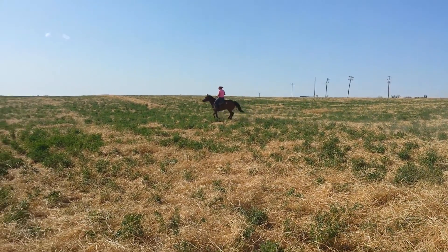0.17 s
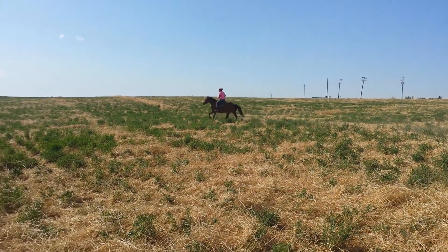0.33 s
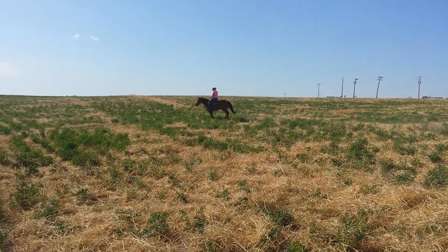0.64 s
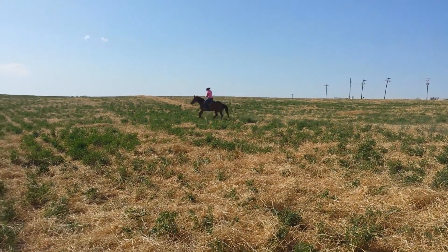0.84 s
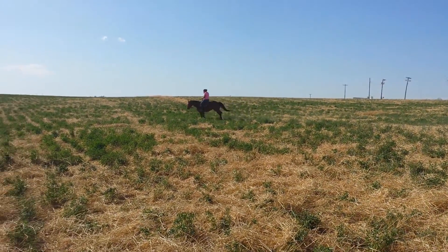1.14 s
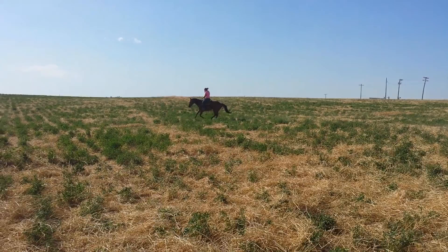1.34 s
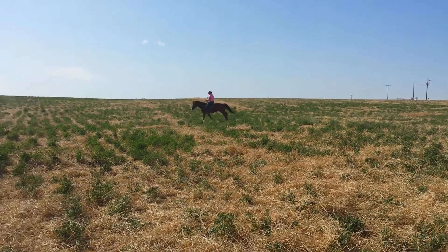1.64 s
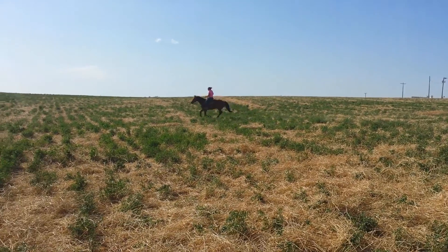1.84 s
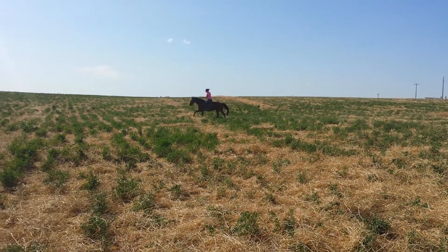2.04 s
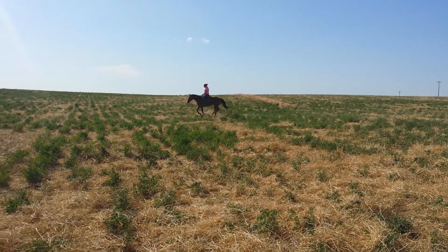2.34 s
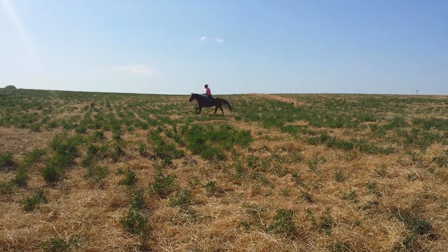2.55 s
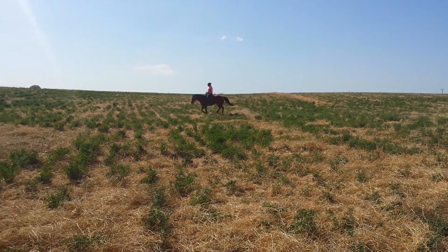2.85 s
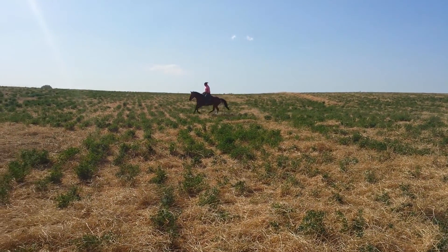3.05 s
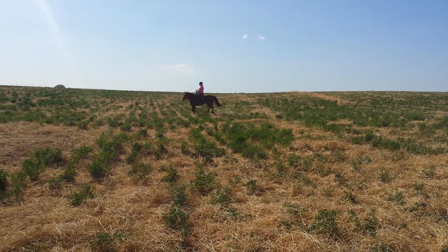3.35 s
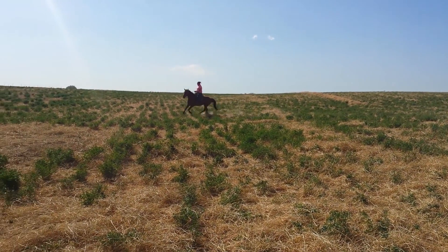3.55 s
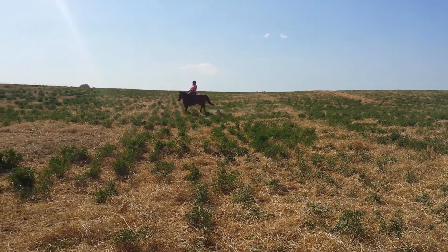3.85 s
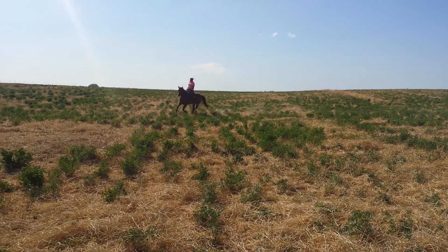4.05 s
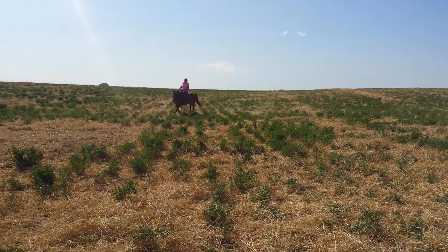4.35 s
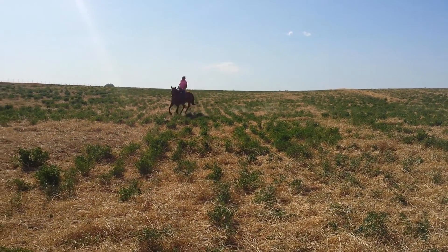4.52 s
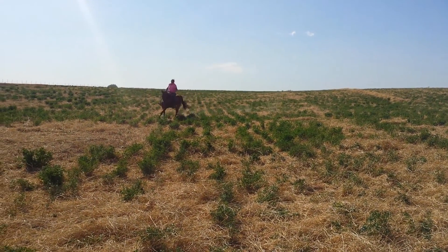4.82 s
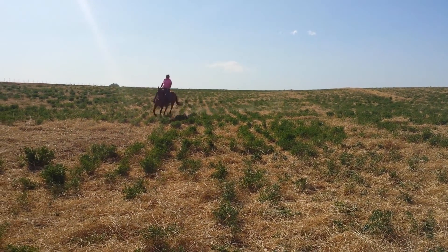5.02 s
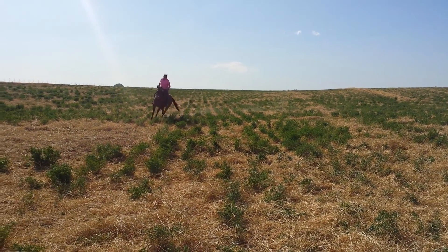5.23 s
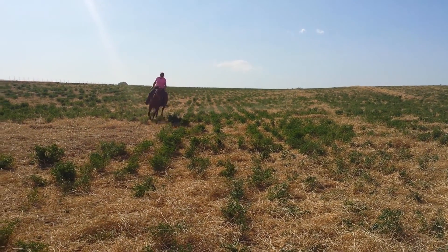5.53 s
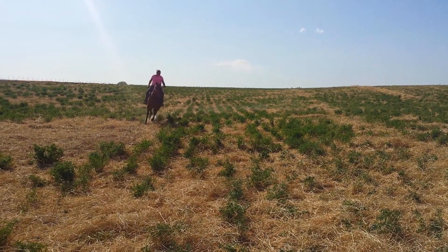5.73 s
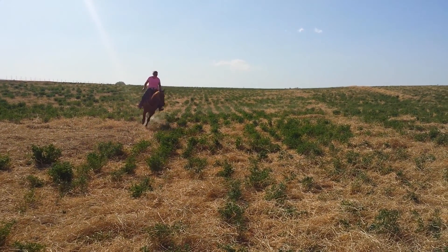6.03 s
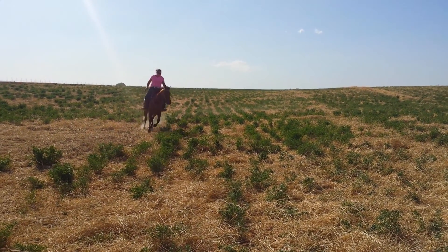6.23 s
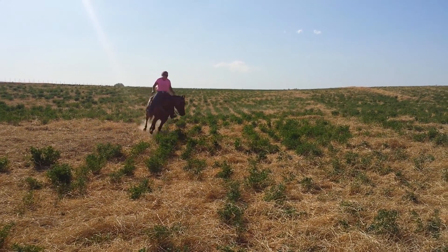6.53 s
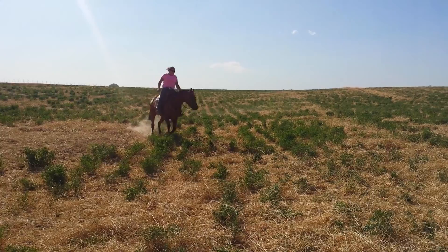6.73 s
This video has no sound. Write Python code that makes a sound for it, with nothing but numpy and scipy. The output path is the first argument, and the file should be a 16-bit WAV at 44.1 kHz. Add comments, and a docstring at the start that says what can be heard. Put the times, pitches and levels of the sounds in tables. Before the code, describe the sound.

A horse canters across an open field, blowing out a short, fluttering snort about twice a second. The snorts start faint and grow clear after two seconds. Its legs swish through dry grass and snap an occasional stalk, louder and brighter as it nears. Low wind rumbles and buffets the hand-held microphone throughout, mostly on the left, while an engine drones faintly far away.

```python
"""Horse cantering through dry grass

A horse arcs across a field towards a hand-held camera. Once a stride it blows out, and its nostrils
chop the airflow about 30 times a second. Its legs brush dry grass into a swish and snap a stalk now
and then; a few thin squeaks sound. Turbulent wind rumbles and buffets at the two microphone ports,
mostly the left one, while an engine drones far away."""
import sys
import numpy as np
from scipy import signal
from scipy.fft import rfft, irfft
from scipy.io import wavfile
from scipy.ndimage import uniform_filter1d, map_coordinates

SR = 44100
rng = np.random.default_rng(int(sys.argv[2]) if len(sys.argv) > 2 else 0)


def store_wav(level_fs):
    """Save 16-bit WAV to argv[1]."""
    pcm = np.round(np.clip(np.atleast_2d(level_fs), -1, 1) * 32767)
    wavfile.write(sys.argv[1], SR, pcm.T.astype(np.int16))


N = 303496
TIME = np.arange(N) / SR
FREQ = np.maximum(np.arange(N // 2 + 1) * SR / N, 1)
# strength of the wind at the ports (time [s], left relative level [dB], right relative level [dB])
GUSTS = [(0, -42, -37), (0.18, -36, -32), (0.33, -40, -36), (0.48, -27.5, -34), (0.7, -35.5, -37),
         (0.82, -32.5, -34), (0.93, -37.5, -33.5), (1.1, -33.5, -35), (1.28, -39.5, -32.5),
         (1.52, -31, -32.5), (1.63, -31.5, -31.5), (1.85, -31, -35), (1.97, -35.5, -38), (2.12, -33.5, -32),
         (2.4, -34, -30.5), (2.58, -29.5, -33.5), (2.75, -37, -33.5), (3.06, -36.5, -31.5),
         (3.3, -30.5, -33), (3.45, -45.5, -36), (3.58, -30.5, -37.5), (3.68, -42, -41),
         (3.82, -31.5, -34.5), (4.05, -34, -30), (4.32, -35, -32.5), (4.47, -31, -33.5),
         (4.8, -32.5, -32.5), (5.05, -36, -32.5), (5.3, -40, -31.5), (5.42, -41.5, -33.5),
         (5.72, -36.5, -37), (5.87, -35, -37), (6.08, -30.5, -37), (6.2, -53, -37.5), (6.5, -42, -36.5),
         (6.88, -47, -39)]


def undb(db):
    """Decibels to amplitude ratio."""
    return 10 ** (np.asarray(db) / 20)


def level(x, db):
    """Scale to an rms level."""
    return x * undb(db) / np.sqrt(np.mean(x ** 2))


def curve(rows, column=1):
    """Linear interpolation of one table column over time."""
    rows = np.asarray(rows, float)
    return np.interp(TIME, rows[:, 0], rows[:, column])


def colour(x, points):
    """Minimum-phase filter with a (frequency [Hz], gain [dB]) response, by folding the cepstrum."""
    size = len(x)
    hz, db = np.transpose(points)
    freq = np.maximum(np.arange(size // 2 + 1) * SR / size, 1)
    gain = undb(np.interp(np.log(freq), np.log(hz), db))
    cepstrum = irfft(np.log(gain), size)
    cepstrum[1:size // 2] *= 2
    cepstrum[size // 2 + 1:] = 0
    return irfft(rfft(x) * np.exp(rfft(cepstrum)), size)


def treble(x, hz):
    """Zero-phase high-pass filter with a soft edge."""
    return irfft(rfft(x) / (1 + (hz / FREQ) ** 4), N)


def wander(per_s):
    """Smooth random modulation with a standard deviation near 1."""
    hold = max(int(SR / per_s), 1)
    steps = rng.standard_normal(N)[np.arange(N) // hold]
    return uniform_filter1d(steps, hold) * np.sqrt(3 / 2)


def grains(patchy_db, per_s):
    """Random amplitude modulation makes white noise grainy."""
    return rng.standard_normal(N) * undb(patchy_db * wander(per_s))


def bell(t, half_s):
    """Gaussian envelope centred on t = 0."""
    return np.exp(-.5 * (t / half_s) ** 2)


def add(out, start_s, sound):
    """Superpose a short sound at a given time."""
    i = int(np.clip(start_s * SR, 0, N - 1))
    out[i:i + len(sound)] += sound[:N - i]


def wind(left_db=2.5, lumpy_db=2, lumps_per_s=18):
    """Turbulent pressure is uncorrelated between the ports; shelter thins the right one's low mids."""
    # spectrum of the turbulence (frequency [Hz], relative density [dB])
    spectrum = [(20, -37.5), (35, -11.5), (60, 0), (90, 0), (125, -1.5), (160, -5), (230, -10.5),
                (300, -21.5), (450, -33), (700, -40), (1200, -49.5)]
    # shelter of the right port (frequency [Hz], gain [dB])
    shelter = [(40, -3), (90, -4), (160, -8), (300, -10.5), (600, 0.5)]
    left = colour(grains(patchy_db=4.5, per_s=90), spectrum)
    left = level(left * undb(lumpy_db * wander(lumps_per_s)), left_db)
    right = colour(colour(grains(patchy_db=3, per_s=76), spectrum), shelter)
    right = level(right * undb(lumpy_db * wander(lumps_per_s)), 0)
    return np.array([left * undb(curve(GUSTS)), right * undb(curve(GUSTS, column=2))])


def field(side_db=-4):
    """Open-air background with a steady rustle that swells as the horse nears; its treble is diffuse."""
    # spectrum of background and rustle (frequency [Hz], relative density [dB])
    spectrum = [(150, 25.5), (400, 8), (620, -1), (860, 9), (1300, 0), (1700, 4.5), (2400, -7),
                (3500, -10.5), (6000, -29.5), (9000, -23), (15000, -7)]
    # the rustle swells as the horse approaches (time [s], relative level [dB])
    approach = [(0, -49), (2, -46), (3.2, -46), (5, -46), (6, -43), (6.88, -39.5)]
    mid, side = (level(colour(rng.standard_normal(N), spectrum), 0) for _ in range(2))
    side = undb(side_db) * treble(side, hz=1230)
    swell_db = .8 * wander(5)
    return np.array([mid + side, mid - side]) * undb(curve(approach) + swell_db)


def engine():
    """Periodic firing gives harmonics; moving air modulates the amplitude and phase of each on its own."""
    # shaft speed (time [s], rate [turns/s])
    speed = [(0, 19.1), (1, 19.3), (2, 20.2), (2.7, 21.8), (3.2, 21.95), (4.2, 22.4), (5.3, 22.35),
             (6.3, 21.85), (6.88, 21.3)]
    # firing harmonics (order [multiple of shaft rate], relative level [dB])
    orders = [(6, 5), (9, -5.5), (14, -19.5), (16, -17), (18, -17), (20, -18.5), (22, -12), (24, -15),
              (26, -25), (30, -26), (32, -18.5)]
    # strength of the overtones above the hum (time [s], gain [dB])
    overtones = [(0, -2), (2.8, -4), (3.7, 1.5), (4.8, 0.5), (5.8, -8.5), (6.88, -6.5)]
    # strength of the whole drone (time [s], level [dB])
    strength = [(0, -54), (2.6, -50.5), (3.2, -44), (4.2, -44), (5.1, -44), (5.7, -41.5), (6.88, -45.5)]
    shaft_phase = 2 * np.pi * np.cumsum(curve(speed)) / SR
    drone = np.zeros(N)
    for order, db in orders:
        gain_db = db + 2.2 * wander(8) + curve(overtones) * (order > 10)
        blur_rad = .35 * wander(10)
        drone += undb(gain_db) * np.sin(order * shaft_phase + blur_rad)
    return level(drone, 0) * undb(curve(strength))


def leg_sweeps(fall_stretch=1.3, lull_half_s=0.024):
    """Envelope of the swish: incoherent sources add in power, here leg sweeps and a running rustle."""
    # rustle as the horse nears (time [s], relative level [dB])
    rustle = [(0, -57.5), (1.25, -60), (2.3, -50.5), (3.5, -53), (5.5, -48), (6.88, -49.5)]
    # legs passing through the grass (time [s], relative level [dB], half length of the rise [s])
    sweeps = [(0.049, -49, 0.037), (0.358, -46.5, 0.053), (0.511, -46, 0.019), (0.856, -46.5, 0.041),
              (1.007, -54.5, 0.03), (1.173, -46.5, 0.0094), (1.345, -56, 0.016), (1.452, -46, 0.042),
              (1.963, -54, 0.076), (2.203, -45.5, 0.021), (2.491, -42, 0.046), (2.77, -48.5, 0.062),
              (3.055, -41, 0.018), (3.173, -48.5, 0.05), (3.6, -46, 0.091), (3.73, -45, 0.069),
              (4.103, -44.5, 0.047), (4.218, -42, 0.031), (4.373, -44.5, 0.012), (4.633, -45.5, 0.058),
              (4.755, -41, 0.066), (5.22, -42.5, 0.073), (5.375, -41.5, 0.024), (5.612, -39, 0.0062),
              (5.702, -41, 0.015), (5.788, -35.5, 0.025), (5.917, -43, 0.012), (6.131, -40.5, 0.013),
              (6.305, -41.5, 0.036), (6.395, -40.5, 0.046), (6.679, -42, 0.005), (6.72, -41.5, 0.044),
              (6.846, -35, 0.037)]
    # lulls while the legs are clear of the grass (time [s], gain [dB])
    lulls = [(1.68, -2), (2.92, -7), (3.451, -5.5), (3.82, -8), (3.999, -1), (4.189, -6), (4.5, -2),
             (5.04, -4), (5.45, -8.5), (5.58, -14), (5.94, -7), (6.2, -2.5), (6.505, -3), (6.652, -8)]
    power = undb(curve(rustle)) ** 2
    for s, db, half_s in sweeps:
        width_s = half_s * np.where(TIME < s, 1, fall_stretch)
        power += (undb(db) * bell(TIME - s, width_s)) ** 2
    lull_db = sum(db * bell(TIME - s, lull_half_s) for s, db in lulls)
    return np.sqrt(power) * undb(lull_db)


def grass(envelope, gain_db=-3, flicker_db=2, head_on_s=(4.65, 5.45)):
    """Friction on countless dry blades sums to a swish, brighter close up and hollower head-on."""
    # spectrum of brushed grass (frequency [Hz], relative density [dB])
    spectrum = [(500, -8), (900, -1), (1300, -7), (1700, -5.5), (2500, 0.5), (3500, -8.5), (4600, -6),
                (5800, 2), (7500, 2), (9300, -6.5), (11300, 2.5), (13500, -5.5), (15500, -12)]
    # colouring with the horse head-on (frequency [Hz], gain [dB])
    head_on = [(2000, 0), (2800, -3.5), (3300, -1), (3750, -6), (4400, 2), (6000, 1), (6500, 1.5),
               (7700, -0.5), (8450, -25), (9050, -8.5), (10200, -2), (12000, -5), (14000, -1.5)]
    # the top octave grows as the horse comes closer (time [s], gain [dB])
    top_octave = [(0, -7), (2.5, -20), (3.2, -13), (3.7, -12), (4.3, 2), (4.6, -20), (4.76, -7), (5.2, -7),
                  (5.65, 2), (5.85, 2.5), (6.35, 2.5), (6.88, 1)]
    blades = level(grains(patchy_db=0.5, per_s=1800), 0) + straws()
    brushing = level(colour(blades, spectrum), 0) * undb(flicker_db * wander(70))
    swish = undb(gain_db) * (brushing + crackle()) * envelope
    facing = np.interp(TIME, head_on_s, [0, 1])
    swish = (1 - facing) * swish + facing * colour(swish, head_on)
    return swish + treble(swish, hz=9400) * (undb(curve(top_octave)) - 1)


def straws(ticks_per_s=190):
    """Stiff straws tick as damped resonators, each of eight struck by its own random impulses."""
    out = np.zeros(N)
    for hz in np.geomspace(1800, 13500, 8):
        ticks = rng.choice([-1, 1], N) * (rng.random(N) < ticks_per_s / SR)
        out += signal.lfilter(*signal.iirpeak(hz, Q=3.5, fs=SR), ticks)
    return level(out, 0)


def crackle(count=420, decay_s=0.00066, lowest_hz=4500):
    """Brittle fracture: stems crack at random, each burst exciting a resonance of its own pitch."""
    out, t = np.zeros(N), np.arange(SR // 150) / SR
    for when, pitch, size in rng.random((count, 3)):
        burst = rng.standard_normal(len(t)) * np.exp(-t / decay_s)
        crack = signal.lfilter(*signal.iirpeak(lowest_hz * 3 ** pitch, Q=2, fs=SR), burst)
        peak_db = 6 * size - 1  # relative to the rms of the brushing
        add(out, when * N / SR, crack / abs(crack).max() * undb(peak_db))
    return out


def snorts(leak_db=-21, leak_s=0.019, slowing=0.021, bright_hz=1850, turn_s=(1.9, 3.9), gain_db=-0.5):
    """The nostrils act as a fluttering valve, releasing turbulent puffs that nasal resonances filter."""
    # one blow a stride (time [s], relative level [dB], flap rate [1/s], flaps [count], brightness [dB],
    # half length of a flap [s], crest [share of the blow], fall from the crest [dB per share squared])
    blows = [(0.093, -52, 19, 3, -11, 0.014, 0.29, 33), (0.61, -52, 33, 3, 10, 0.017, 0.29, 31),
             (1.149, -40.5, 28, 2, -1, 0.0074, 0.19, 42), (1.291, -39, 32.8, 4, 0.5, 0.0087, 0.43, 15),
             (1.713, -42, 22.4, 3, 0, 0.0092, 0.13, 21), (2.259, -28.5, 32.7, 6, 2.5, 0.0066, 0.47, 83),
             (2.945, -32, 32.8, 4, 2.5, 0.0074, 0.48, 34), (3.388, -39, 25.3, 2, -2, 0.0075, 0.4, 12),
             (3.873, -34.5, 30.5, 3, 1.5, 0.0047, 0.42, 5), (4.41, -32, 30, 4, 1.5, 0.0054, 0.39, 38),
             (4.947, -29.5, 30.7, 4, 1, 0.0049, 0.43, 52), (5.481, -31.5, 30.7, 4, 3.5, 0.006, 0.29, 31),
             (6.012, -28, 31.8, 4, 3, 0.006, 0.37, 88), (6.538, -32, 30.4, 4, 3.5, 0.0064, 0.42, 32)]
    # nasal resonances (frequency [Hz], relative density [dB])
    resonances = [(100, -33), (350, -10), (600, -13), (800, 2.5), (1020, 11), (1350, 4.5), (1620, 9),
                  (1950, -5), (2550, -3), (3150, -14), (3900, -24.5), (5200, -17), (6000, -17), (8000, -28),
                  (15000, -73)]
    # colouring from the side, lost as the head turns to the camera (frequency [Hz], gain [dB])
    side_on = [(600, -0.5), (850, 3), (1060, -5.5), (1550, 0.5), (2100, 16), (2700, -6), (3100, 2.5),
               (4200, 2.5)]
    out, t = np.zeros(N), np.arange(-2048, 2048) / SR
    hz, nasal_db = np.transpose(resonances)
    breath = grains(patchy_db=2.4, per_s=900)
    for start, snort_db, per_s, flaps, bright_db, half_s, crest, arch_db in blows:
        opening = np.exp(-.5 * abs(t / (0.98 * half_s)) ** 1.7)
        opening += undb(leak_db) * bell(t, leak_s)  # a little air leaks between puffs
        aside = np.interp(start, turn_s, [1, 0])
        heard_db = nasal_db + aside * np.interp(hz, *np.transpose(side_on))
        for k, (shift, tilt) in enumerate(rng.standard_normal((flaps, 2))):
            s = start + k * (1 + slowing * k) / per_s
            flap_db = snort_db - arch_db * ((k + .5) / flaps - crest) ** 2
            # each flap reshapes the nostrils, moving their resonances and favouring some over others
            top_db = (bright_db + 3.5 * tilt) / (1 + (bright_hz / hz) ** 4)
            uneven_db = 2.5 * rng.standard_normal(len(hz))
            nose = np.transpose([hz * np.exp(0.023 * shift), heard_db + top_db + uneven_db])
            puff = colour(breath[int(s * SR):][:len(t)], nose) * opening
            add(out, s + t[0], level(puff, flap_db + gain_db) * np.sqrt(np.mean(opening ** 2)))
    return out


def small_eddies(count=24, centre_hz=138, spread_octaves=0.99, cycles=0.95, over_wind_db=12):
    """Advection: the wind carries eddies to the left port at random, and their strength follows its own."""
    jitter, pitch = rng.uniform(-1.1, 1, (count, 2)).T
    times = (np.arange(count) + (1 + jitter) / 2) / count * N / SR
    peaks_db = np.interp(times, TIME, curve(GUSTS)) + over_wind_db
    pitches_hz = centre_hz * 2 ** (spread_octaves * pitch)
    return [(s, db, hz, cycles, 0) for s, db, hz in zip(times, peaks_db, pitches_hz)]


def buffets(gain_db=0.17, shreds_db=-20):
    """Pseudo-sound: a passing eddy gives one port a ragged pressure kick, quicker for a smaller eddy."""
    # the strongest eddies
    # (time [s], relative peak [dB], nominal pitch [Hz], length [cycles], port [0 left, 1 right])
    strong_eddies = [(0.355, -17, 131, 0.7, 0), (0.4, -12.5, 108, 0.99, 0), (0.451, -13.5, 188, 0.57, 0),
                     (0.488, -17.5, 260, 0.73, 0), (0.53, -14, 223, 0.94, 0), (0.532, -23.5, 620, 1.4, 0),
                     (0.546, -11, 190, 0.6, 0), (0.56, -18, 137, 2, 0), (0.656, -13.5, 240, 0.82, 0),
                     (0.678, -18, 136, 1.35, 0), (0.722, -25.5, 102, 4.1, 0), (0.778, -14, 146, 0.38, 0),
                     (0.798, -15.5, 168, 0.76, 0), (0.811, -11, 200, 0.73, 0), (0.812, -17, 90, 1.9, 1),
                     (0.825, -9, 150, 0.54, 0), (0.833, -8.5, 226, 0.53, 0), (0.842, -9, 127, 0.77, 0),
                     (0.97, -17, 118, 0.74, 0), (1.04, -18.5, 193, 0.85, 0), (1.073, -22.5, 160, 1.6, 0),
                     (1.121, -18.5, 165, 0.73, 0), (1.329, -15.5, 113, 0.87, 0), (1.47, -17, 115, 1.1, 0),
                     (1.491, -18, 130, 0.54, 0), (1.521, -29, 288, 0.54, 0), (1.554, -26, 230, 0.86, 0),
                     (1.595, -14, 197, 0.71, 0), (1.608, -13.5, 334, 0.57, 0), (1.623, -21.5, 250, 0.9, 0),
                     (1.647, -23, 270, 0.45, 0), (1.694, -26, 95, 2.1, 1), (1.732, -15, 164, 0.61, 0),
                     (1.805, -27, 184, 1.2, 0), (1.821, -23, 190, 0.66, 0), (1.863, -18, 200, 0.5, 0),
                     (2.071, -18, 194, 1.7, 0), (2.098, -15, 252, 0.53, 0), (2.125, -21, 110, 2.6, 0),
                     (2.231, -22, 111, 1.2, 1), (2.407, -14, 121, 2, 0), (2.408, -9, 360, 0.91, 0),
                     (2.427, -14.5, 162, 2.1, 0), (2.484, -19.5, 246, 0.76, 0), (2.541, -17.5, 202, 2.4, 0),
                     (2.552, -11, 128, 0.54, 0), (2.62, -14.5, 211, 0.5, 0), (2.741, -25.5, 133, 0.91, 1),
                     (2.764, -26, 112, 0.83, 1), (2.844, -15, 176, 1, 0), (2.961, -20, 228, 1.6, 0),
                     (3.061, -17, 125, 1.8, 0), (3.59, -14.5, 243, 1.06, 0), (3.958, -13, 150, 0.62, 0),
                     (4.028, -20.5, 266, 0.86, 0), (4.058, -19, 163, 0.6, 0), (4.147, -22.5, 144, 1.6, 0),
                     (4.5, -24.5, 113, 5.3, 0), (4.57, -20.5, 104, 1.1, 0), (4.63, -14, 200, 0.35, 0),
                     (4.779, -26.5, 360, 0.92, 0), (4.794, -24, 220, 0.89, 0), (4.815, -9.5, 139, 2.1, 0),
                     (4.856, -12.5, 207, 1.1, 0), (4.885, -28, 130, 0.66, 0), (4.944, -14.5, 140, 1.1, 0),
                     (4.974, -18.5, 168, 0.61, 0), (5.299, -19.5, 150, 1.75, 0), (5.539, -18, 204, 1.3, 0),
                     (5.619, -24.5, 250, 1.4, 0), (5.633, -15.5, 148, 2.3, 0), (5.646, -20, 124, 1.2, 0),
                     (5.672, -29, 260, 0.41, 0), (5.761, -23, 220, 0.54, 0), (5.808, -24, 150, 1.4, 0),
                     (5.863, -16, 148, 1.3, 0), (5.879, -16, 100, 1.26, 0), (5.893, -14.5, 182, 1.44, 0),
                     (5.948, -13.5, 174, 0.34, 0), (5.961, -20, 141, 0.94, 0), (6.004, -25, 102, 1.5, 1),
                     (6.048, -16, 198, 0.81, 0)]
    # fine turbulence in an eddy's core (frequency [Hz], relative density [dB])
    core_spectrum = [(100, -20.5), (250, 7), (420, -1), (650, -18.5), (1000, -31.5), (2000, -60)]
    out, t = np.zeros((2, N)), np.arange(-SR // 25, SR // 25) / SR
    eddies = list(strong_eddies) + small_eddies()
    shreds = level(colour(rng.standard_normal(N), core_spectrum), shreds_db)
    for s, peak_db, hz, cycles, port in eddies:
        turn, place = rng.random(2)
        swing = .8 * hz * t + .1 * np.arctan(3 * hz * t)  # fastest as the core passes
        core = shreds[int(place * (N - len(t))):][:len(t)]
        pressure = np.cos(2 * np.pi * (swing + turn)) + core
        envelope = undb(peak_db + gain_db) / np.cosh(2 * t * hz / cycles)
        add(out[int(port)], s + t[0], envelope * pressure)
    return out


def snaps(decay_s=0.0025, band_ratio=1.2, gain_db=-2):
    """A breaking stalk releases its strain as a bright, exponentially decaying burst of noise."""
    # dry stalks breaking (time [s], relative peak [dB], lower band edge [Hz])
    breaks = [(0.24, -36.5, 5630), (0.525, -38, 5600), (1.4905, -39, 9500), (1.744, -43, 5100),
              (2.361, -30, 5540), (2.373, -39, 6340), (2.583, -49, 5200), (2.771, -37, 5800),
              (2.797, -36, 4570), (3.477, -36, 5200), (3.5967, -33, 5650), (3.691, -41, 5800),
              (3.7574, -41, 4750), (4.3267, -32.5, 4600), (4.3635, -36, 5540), (4.371, -40, 5260),
              (4.7586, -43, 4800), (5.331, -38, 4710), (5.613, -40, 5510), (5.7648, -36, 4870),
              (5.9637, -27, 5200), (6.303, -29.5, 5430), (6.474, -35, 9500), (6.6742, -33, 4860),
              (6.83, -30, 4860)]
    out, t = np.zeros(N), np.arange(SR // 50) / SR
    for s, peak_db, hz in breaks:
        burst = rng.standard_normal(len(t)) * np.exp(-t / decay_s)
        crack = signal.lfilter(*signal.butter(1, [hz, hz * band_ratio], "band", fs=SR), burst)
        add(out, s, crack / abs(crack).max() * undb(peak_db + gain_db))
    return out


def squeaks(waver=0.086, rough_db=4):
    """Random frequency and amplitude modulation makes brief gliding whistles hoarse."""
    # thin whistles (time [s], half length [s], level [dB], pitch [Hz], glide [octaves/s])
    whistles = [(1.166, 0.0036, -36, 2060, 6), (1.179, 0.0028, -38, 2230, 3), (1.2, 0.0083, -49, 2400, 6),
                (2.818, 0.0028, -45, 3330, -3), (2.834, 0.0041, -45, 3400, -4)]
    out, t = np.zeros(N), np.arange(-SR // 40, SR // 40) / SR
    for s, half_s, db, hz, glide in whistles:
        pitch = hz * 2 ** (glide * t) * (1 + waver * wander(830)[:len(t)])
        swell = undb(db + rough_db * wander(506)[:len(t)]) * bell(t, half_s)
        add(out, s + t[0], swell * np.sin(2 * np.pi * np.cumsum(pitch) / SR))
    return out


def scene(scatter_db=-7):
    """A path difference delays the horse at the left port; the field scatters some swish diffusely."""
    # lag of the left port behind the right (time [s], delay [ms])
    port_lag = [(0, 0.0026), (1, 0.0031), (3.5, 0.0061), (5, 0.061), (6.88, 0.071)]
    # cavity resonances of the left port (frequency [Hz], gain over the right port [dB])
    left_cavity = [(700, 2), (1150, 4), (1600, 2.5), (2300, 5), (2900, 9.5), (4000, 3), (4750, 18),
                   (5150, 12.5), (5570, 13.5), (6000, 7), (6450, 7), (7300, 6), (8600, 4), (10800, 3),
                   (13500, -4)]
    envelope = leg_sweeps()
    horse = snorts() + squeaks() + grass(envelope) + snaps()
    scattered = undb(scatter_db) * grass(envelope)
    delayed = map_coordinates(horse, [np.arange(N) - curve(port_lag) * SR / 1000], order=3)
    left, right = np.array([delayed + scattered, horse - scattered]) + field() + engine()
    return np.array([colour(left, left_cavity), right]) + wind() + buffets()


def record(dry):
    """Band limiting: the camera's steep low-pass filter removes the highest treble."""
    cutoff_hz = 15600
    return signal.sosfilt(signal.ellip(10, .2, 80, cutoff_hz, fs=SR, output="sos"), dry)


dry = scene()
out = record(dry)
store_wav(out)
```